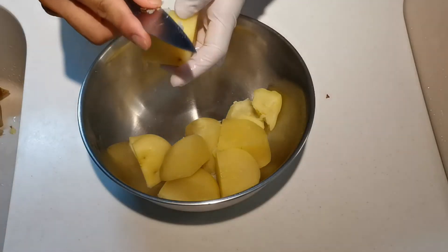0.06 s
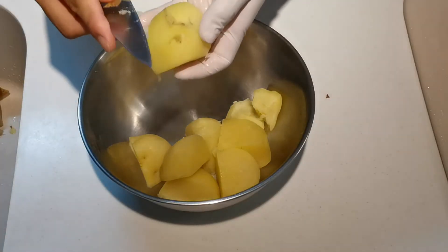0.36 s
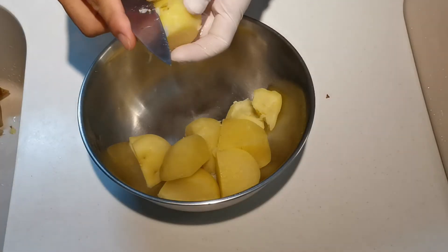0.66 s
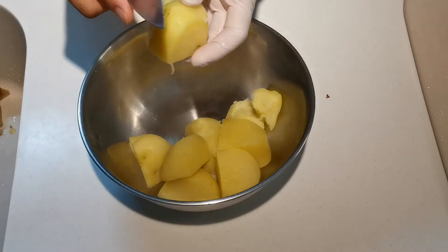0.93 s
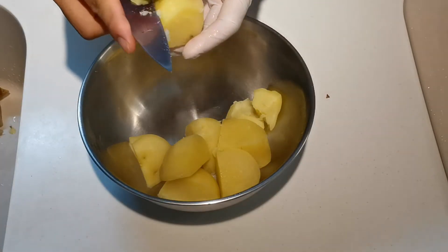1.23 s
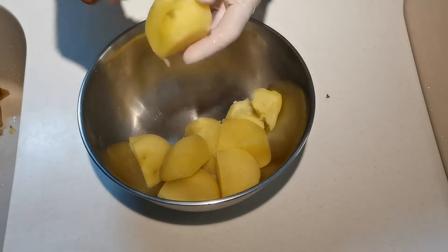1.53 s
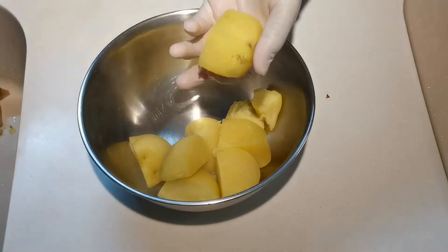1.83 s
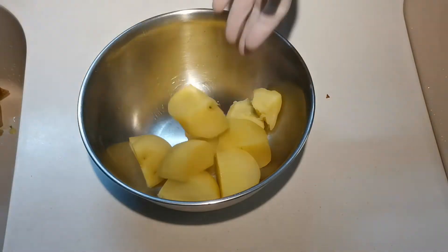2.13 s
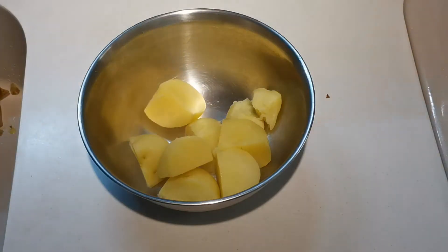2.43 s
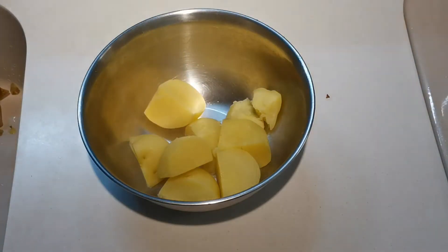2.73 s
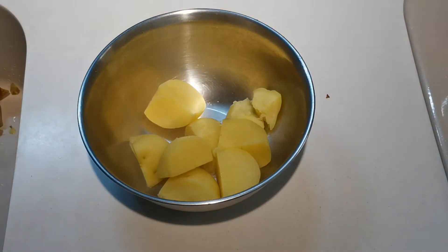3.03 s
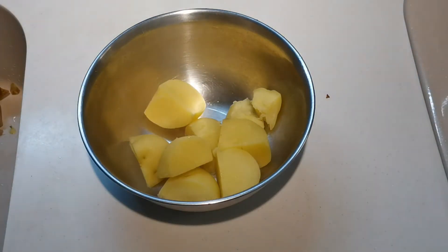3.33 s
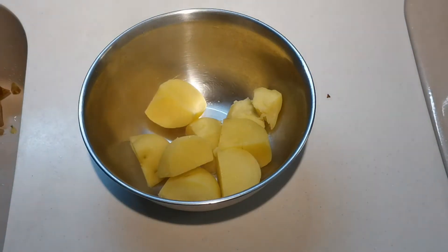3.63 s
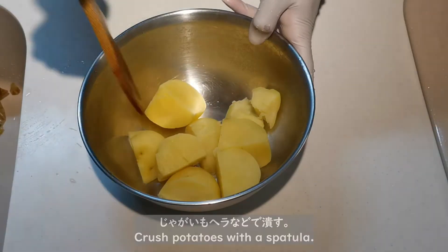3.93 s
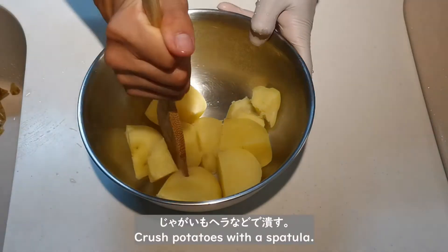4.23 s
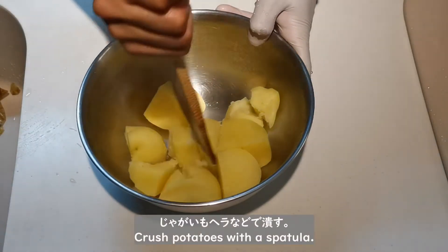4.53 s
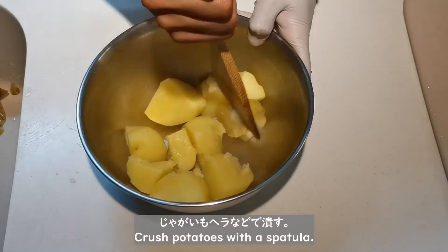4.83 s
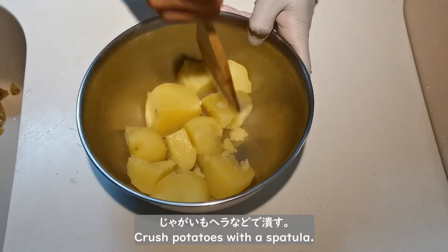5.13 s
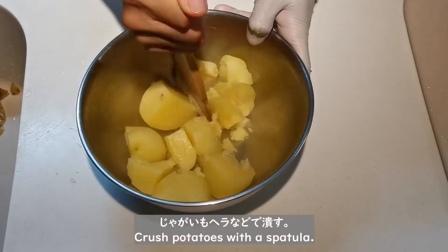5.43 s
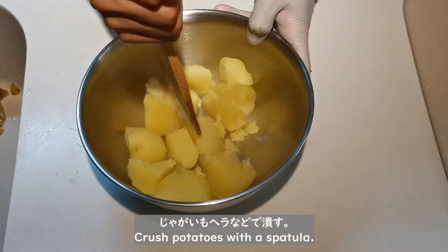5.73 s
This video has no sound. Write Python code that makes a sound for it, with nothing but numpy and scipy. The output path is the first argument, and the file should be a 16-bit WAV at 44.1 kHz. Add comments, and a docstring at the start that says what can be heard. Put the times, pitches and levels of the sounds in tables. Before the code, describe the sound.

In a small kitchen with a steady ventilation hiss, a knife cuts a boiled potato with faint wet slides and sticky ticks. A piece drops into a steel bowl with two soft, low thuds. After a pause and one dry tick, a wooden spatula chops down about six times, each stroke a moist squish and a short hollow knock on the steel. The sound is close, slightly to the right.

```python
"""A small kitchen, ringing briefly over a steady ventilation hiss. A boiled potato is cut over a steel
bowl and a piece drops in; then a wooden spatula chops down through the pieces.
The wet flesh squishes as tiny cells burst, and ticks as sticky surfaces part. Each stroke passes
through potato, then strikes the steel and excites its normal modes: a short hollow note, damped by
the food and a hand, with a boom from the worktop."""
import sys
import numpy as np
from scipy import signal
from scipy.fft import rfft, irfft
from scipy.io import wavfile
from scipy.ndimage import uniform_filter1d

SR = 44100
rng = np.random.default_rng(int(sys.argv[2]) if len(sys.argv) > 2 else 0)


def output_pcm(signal):
    """Save a mono or channel-first signal as 16-bit PCM at the path in sys.argv[1].

    Samples are clipped to [-1, 1] before scaling.
    """
    pcm = np.clip(np.atleast_2d(signal).T, -1, 1) * 32767
    wavfile.write(sys.argv[1], SR, np.round(pcm).astype(np.int16))


N = 263277
HZ = np.fft.rfftfreq(8192, 1 / SR) + 1  # frequency axis of pulse spectra


def amp(db):
    """Amplitude ratio of a level in decibels."""
    return 10 ** (np.asarray(db) / 20)

def unit_rms(x):
    """Normalisation to unit mean power."""
    return x / np.sqrt(np.mean(x ** 2) + 1e-20)

def curve(points, hz):
    """Interpolation on a log-frequency axis."""
    f, value = np.transpose(points)
    return np.interp(np.log(hz + 1), np.log(f + 1), value)

def bell(hz, centre_hz, octaves):
    """A Gaussian band on a log-frequency axis."""
    return np.exp(-.5 * (np.log2((hz + 1) / centre_hz) / octaves) ** 2)

def decay(t, t60):
    """Exponential damping: 60 dB in t60 seconds."""
    return np.exp(-np.log(1000) * t / t60)

def add(mix, s, sound):
    """Superposition of a sound starting at s seconds."""
    part = mix[..., max(round(s * SR), 0):][..., :sound.shape[-1]]
    part += sound[..., :part.shape[-1]]

def convolve(x, response):
    """Passage through a linear system, channel by channel."""
    return signal.fftconvolve(np.atleast_2d(x), np.atleast_2d(response), axes=1)[:, :N]

def pulse(gain):
    """Minimum phase: the shortest causal pulse with this spectrum."""
    log_gain = np.log(np.maximum(gain, 1e-5))
    mirrored = np.r_[log_gain, log_gain[-2:0:-1]]
    return np.fft.ifft(np.exp(np.conj(signal.hilbert(mirrored)))).real[:len(gain) // 2]

def panned(x, pan_db):
    """Localisation by level difference, left minus right."""
    return x * amp([[pan_db / 2], [-pan_db / 2]])

# spectrum of the air noise: (frequency [Hz], relative level [dB])
VENT_SPECTRUM = [(15, -30), (25, -5), (120, -4), (170, -10), (200, -2.5), (235, -5), (291, -9.5),
                 (572, -15), (637, -14), (691, -16), (3050, -22), (3880, -24), (4450, -24.5), (5820, -28.5),
                 (11000, -36.5), (15800, -31)]
# duct resonances, one dip and a faint whine: (frequency [Hz], width [Hz], gain [dB])
DUCT_PEAKS = [(195.6, 7.5, 11.5), (639, 17, 7), (2243, 10.4, 12.5), (2925, 380, 5), (4850, 740, 5),
              (5600, 660, -4.5), (15630, 110, 16)]
# likeness of left and right: (frequency [Hz], correlation [-1 to 1])
VENT_CORRELATION = [(60, 0.2), (180, 0.78), (550, 0.44), (1650, -0.06), (4970, 0.099), (15000, -0.12)]
def ventilation(level_db=-58):
    """Broadband air noise, coloured by duct resonance and partly correlated between the sides."""
    hz = np.fft.rfftfreq(N, 1 / SR)
    left, independent = rfft(rng.standard_normal((2, N)))
    alike = np.clip(curve(VENT_CORRELATION, hz), -1, 1)
    right = alike * left + np.sqrt(1 - alike ** 2) * independent
    peaks_db = sum(db / (1 + (2 * (hz - f) / width) ** 2) for f, width, db in DUCT_PEAKS)
    air = irfft(np.array([left, right]) * amp(curve(VENT_SPECTRUM, hz) + peaks_db), N)
    return amp(level_db) * unit_rms(air)

def rim_rub(force_db=-85, peak_s=0.036, swell_s=0.062):
    """Friction: a hand dragging on the rim exerts a low, rough force on the bowl."""
    t = np.arange(SR // 2) / SR
    band = bell(np.fft.rfftfreq(len(t), 1 / SR), centre_hz=247, octaves=0.45)
    drag = irfft(rfft(rng.standard_normal(len(t))) * band, len(t))
    return amp(force_db) * unit_rms(drag) * np.exp(-abs(t - peak_s) / swell_s)

# modes of the loaded bowl and the worktop: (frequency [Hz], relative level [dB], t60 [s])
BOWL_MODES = [(68.7, -53.5, 1.84), (128.2, -43.5, 0.41), (173.2, -40, 0.51), (205.44, -35.5, 0.48),
              (218.5, -40, 0.2), (254.5, -63, 0.23), (283, -49, 0.2), (352, -47, 0.11), (410, -37.5, 0.072),
              (460, -56, 0.047), (520, -50.5, 0.42), (538, -37.5, 0.073), (596, -41.5, 0.29),
              (611, -45, 0.42), (647, -47, 0.16), (724, -47, 0.4), (759, -50, 0.26), (801, -53.5, .28),
              (856, -44, 0.3), (935, -36.5, 0.15), (988.3, -41.5, 0.027), (1020, -44.5, 0.34),
              (1234, -37, 0.066), (1310, -43, 0.2), (1490, -31.5, 0.049), (1814, -55, 0.11),
              (1950, -58, 0.19), (2230, -42, 0.095), (2500, -57, 0.23), (2830, -48, 0.045),
              (3640, -65, 0.029), (4630, -63, .05), (7700, -59, .08)]
# the first push of air from the bowl: (frequency [Hz], relative level [dB])
AIR_PUSH = [(30, -6), (85, 1.5), (130, 15.5), (200, 13.5), (310, -3.5), (450, 8), (1000, -2), (2000, 1),
            (4000, -5), (8000, -7.5), (14000, -26.5)]
def bowl(force, gain_db=15.5, left_bass_db=-3.5, left_treble_db=-4.5, spot_spread_db=4.5, low_cut_hz=58):
    """Modal response: a force pushes the air once and rings each mode as far as the spot allows."""
    t = np.arange(SR) / SR
    push = pulse(amp(curve(AIR_PUSH, HZ)))
    response = np.zeros((2, SR))
    for k, (hz, db, t60) in enumerate(BOWL_MODES):
        treble = min((hz / 800) ** 2, 1)
        strength = amp(db + spot_spread_db * treble * rng.standard_normal())
        ring = strength * np.exp(2j * np.pi * hz * t) * decay(t, t60)
        skew = np.exp(.5j * (-1) ** k * treble)  # higher modes reach the two sides out of phase
        left = amp(left_bass_db + treble * (left_treble_db - left_bass_db))
        response += (np.array([[left / skew], [skew]]) * ring).real
    add(response, 0, amp([[left_bass_db], [0]]) * convolve(push, bending_waves()))
    response = reflections(response)
    add(response, 0, kitchen(push))
    radiation = signal.butter(2, low_cut_hz, "high", fs=SR, output="sos")  # too small for deep bass
    # the bottom is driven away from the listener, so the pressure drops first
    return -amp(gain_db) * convolve(force, signal.sosfilt(radiation, response))

def bending_waves(size=0.12, fade_s=0.0059, above_hz=650, scattered=0.45, left_db=-4):
    """Flexural waves circle the thin wall and smear the treble of a blow over milliseconds."""
    t = np.arange(2048) / SR
    waves = size * rng.standard_normal((3, len(t))) * np.exp(-t / fade_s)
    smear = (waves[2] + 1.8 * waves[:2]) * amp([[left_db], [0]]) - scattered * (t == 0)
    return (t == 0) + signal.sosfilt(signal.butter(2, above_hz, "high", fs=SR, output="sos"), smear)

# echoes off worktop and wall: (delay [s], left gain [ratio], right gain [ratio])
EARLY_ECHOES = [(.0021, -0.29, -0.11), (.0048, 0.17, 0.12), (.0075, 0.39, 0.088), (0.0142, 0.25, 0.22),
                (0.0253, -.12, -.16), (0.0286, 0.08, -0.18)]
def reflections(x):
    """Early reflection: near surfaces add delayed copies to the direct sound."""
    out = x.copy()
    for delay, left, right in EARLY_ECHOES:
        add(out, delay, np.array([[left], [right]]) * x)
    return out

# reverberation time: (frequency [Hz], t60 [s])
KITCHEN_T60 = [(100, 1.1), (400, 0.4), (1100, 0.42), (3000, 0.54), (8000, 0.41), (15000, 0.5)]
# colour of the reverberation: (frequency [Hz], relative level [dB])
KITCHEN_SPECTRUM = [(60, -34), (200, -1.5), (320, -3), (500, -1.5), (900, 6.5), (2000, -4), (5000, -1),
                    (10000, -4), (15000, -4)]
def kitchen(x, left_db=3.5, right_db=7.0, alike_below_hz=380):
    """Diffuse reverberation: dense echoes die band by band; long waves are alike on both sides."""
    shape = (2, 24000)
    taps = rng.choice([-1., 1.], shape) * (rng.random(shape) < .2)
    taps[:, :round(.004 * SR)] = 0
    hz, t, bands = signal.stft(unit_rms(taps), SR, nperseg=512)
    hz = hz[:, None]
    alike = 1 / (1 + (hz / alike_below_hz) ** 4)
    bands[1] = alike * bands[0] + np.sqrt(1 - alike ** 2) * bands[1]
    t60 = curve(KITCHEN_T60, hz)
    envelope = np.sqrt(2 * np.log(1000) / (t60 * SR)) * decay(t, t60)  # unit energy
    tail = signal.istft(bands * envelope * amp(curve(KITCHEN_SPECTRUM, hz)), SR, nperseg=512)[1]
    return convolve(x, tail * amp([[left_db], [right_db]]))

def long_waves(x, below_hz=400):
    """Coherence at long wavelengths: bass reaches both sides in phase."""
    spectrum = rfft(x)
    alike = 1 / (1 + (np.fft.rfftfreq(N, 1 / SR) / below_hz) ** 4)
    return irfft((1 - alike) * spectrum + alike * panned(spectrum.mean(0), pan_db=-2), N)

def squish(peak_s, db, rise_s, centre_hz, fall_s=0.018, octaves=1, cells=600, ring_cycles=1.24):
    """Bursting wet cells, each a damped oscillator, sum to a swell; gives start time and sound."""
    t = np.arange(-SR // 5, SR // 5) / SR
    age = np.arange(96)  # samples
    when, pitch, size, *phases = rng.random((cells, 5)).T[:, :, None]
    hz = 700 + pitch * (13800 - 700)
    cycles = hz * age / SR
    pop_db = 4.5 * np.minimum(-np.log(size), 3)
    envelopes = amp(pop_db) * np.sqrt(hz) * np.exp(-cycles / ring_cycles)
    pops = [envelopes * np.sin(2 * np.pi * (cycles + phase)) for phase in phases]
    at = (when * (len(t) - len(age))).astype(int) + age
    grains = [np.bincount(at.ravel(), side.ravel(), len(t)) for side in pops]
    band = bell(np.fft.rfftfreq(len(t), 1 / SR), centre_hz, octaves)
    fizz = unit_rms(irfft(rfft(grains) * band, len(t)))
    swell = np.exp(-np.where(t < 0, (t / rise_s) ** 2, t / fall_s))
    return peak_s + t[0], (amp(db) * swell * fizz)[:, t > -peak_s]

# wet slides: (peak time [s], level [dB], rise [s], centre [Hz])
WET_SLIDES = [(.10, -62.5, .031, 4660), (.81, -73, .034, 6960), (.92, -76, .02, 7000),
              (1.39, -70, .019, 7050), (1.739, -70, .012, 8000), (1.865, -65, .053, 2850),
              (1.973, -62, .024, 2860), (1.985, -71, .037, 8000), (2.094, -58.5, .015, 6200),
              (2.149, -58, .037, 7700), (2.346, -59.5, .014, 6760), (2.496, -68, .02, 5600),
              (4.992, -57, .008, 3200), (5.258, -52, .015, 3800), (5.701, -53, .036, 7040),
              (5.735, -58, .023, 6000), (5.767, -52.5, .025, 5630), (5.897, -59, .018, 9000)]
def slides():
    """Sliding friction: potato on knife, glove or other pieces gives a broad fizz."""
    wet = np.zeros((2, N))
    for slide in WET_SLIDES:
        add(wet, *squish(*slide))
    return wet

def snap(db, centre_hz, octaves=0.47, crumble_s=0.0032, crumble=0.11):
    """Adhesion fails: a sticky surface lets go with a sharp click and a short crumbling tail."""
    t = np.arange(512) / SR
    burst = (t == 0) + crumble * rng.standard_normal((2, len(t))) * np.exp(-t / crumble_s)
    return amp(db) * convolve(burst, pulse(bell(HZ, centre_hz, octaves) + 0.076))

# spells of cutting and of mashing: (start [s], end [s], tick rate [1/s], level [dB])
STICKY_SPELLS = [(0.199, 2, 7.1, -63), (4.95, 6.7, 8, -60)]
def sticky_ticks(spread_db=2):
    """Weak adhesion: worked potato comes unstuck in faint ticks at loosely spaced random times."""
    wet = np.zeros((2, N))
    for start, end, per_s, db in STICKY_SPELLS:
        for slot in np.arange(start, end, 1 / per_s):
            s = slot + rng.random() / per_s
            add(wet, s, snap(db - spread_db * rng.standard_normal(), centre_hz=9000))
    return wet

# the loudest releases: (time [s], level [dB], centre [Hz], width [octaves])
LOUD_SNAPS = [(.27, -43, 11200, .47), (.502, -40.5, 7200, 0.99), (0.527, -30.5, 4100, 0.33),
              (2.1394, -22, 11800, 0.1), (2.141, -33, 5530, 1), (2.192, -34, 10800, .47),
              (4.264, -20, 11730, 0.71), (4.711, -12, 6850, 0.18), (4.779, -24, 10800, .1),
              (4.992, -43, 7400, .47), (5.080, -32.5, 7940, 0.39), (5.252, -22.5, 9000, 1),
              (5.5046, -19.5, 8050, 0.64), (5.547, -29, 9000, .5), (5.681, -15, 10400, 0.14),
              (5.681, -10.5, 6850, 0.09), (5.708, -36, 11000, 0.26), (5.756, -13, 4130, 0.29),
              (5.784, -30, 11800, .15), (5.913, -30, 8000, 0.98), (5.951, -23, 7000, 0.38)]
def sticky_snaps():
    """Strong adhesion: pieces pull free in single sharp snaps."""
    wet = np.zeros((2, N))
    for s, *release in LOUD_SNAPS:
        add(wet, s, snap(*release))
    return wet

def contact(corner_hz, fall_db_per_octave):
    """Impact spectrum: flat up to a corner set by the duration of contact."""
    return (1 + (HZ / corner_hz) ** 4) ** (-fall_db_per_octave / 24)

def thud(db, corner_hz=118, bulge_db=5.5):
    """Compliant impact: a long, soft contact gives a force with little treble."""
    bulge = amp(bulge_db * bell(HZ, corner_hz, octaves=0.42))
    return amp(db) * pulse(contact(corner_hz, fall_db_per_octave=22.5) * bulge)

# soft blows on the bowl: (time [s], force level [dB], contact corner [Hz])
SOFT_BLOWS = [(2.143, -20, 118), (2.168, -12.5, 113), (2.186, -17.5, 118), (2.335, -8.5, 143),
              (2.338, -35, 940), (2.349, -24, 810), (4.758, -11.5, 148), (4.7615, -17, 760),
              (4.782, -16.5, 820), (4.955, -8.5, 118), (5.224, -13, 148), (5.226, -31.5, 593),
              (5.674, -7, 109), (5.689, -28, 118), (5.829, -19.5, 118.6), (5.878, -31.5, 780),
              (5.943, -5.5, 148)]
def bumps():
    """Momentum transfer: the force on the bowl as pieces drop or tumble, or blade or hand bumps it."""
    force = np.zeros(N)
    for s, db, corner_hz in SOFT_BLOWS:
        add(force, s, thud(db, corner_hz))
    return force

# squeaks and scrapes: (peak time [s], level [dB], rise and fall [s], centre [Hz], width [octaves])
RUBBING_SQUEAKS = [(2.154, -51.5, .0035, 1250, .081), (2.49, -76, .02, 4800, .05),
                   (2.496, -76, .025, 5820, .04), (2.563, -69.5, .02, 5780, .028),
                   (2.565, -78, .028, 6850, .05), (2.566, -83, .028, 11870, .02),
                   (4.581, -66.5, .12, 4560, .1), (4.649, -61, .06, 1150, .072)]
def squeaks():
    """Rubbing friction: a fizz confined to a narrow band is heard as a pitch."""
    wet = np.zeros((2, N))
    for s, db, swell_s, hz, octaves in RUBBING_SQUEAKS:
        add(wet, *squish(s, db, swell_s, hz, fall_s=swell_s, octaves=octaves))
    return wet

def dry_tick(s=3.6812, db=-12.5):
    """A short dry click between drop and mashing, with no ring."""
    out = np.zeros(N)
    add(out, s, amp(db) * pulse(bell(HZ, centre_hz=885, octaves=0.41) + 0.057))
    return out

def knock(db, corner_hz, fall_db_per_octave, click_db, boom_db, low_hz, low_db, high_hz, high_db):
    """Impact of wood on steel: a film of potato cushions it, and each spot favours other modes."""
    blow = np.hypot(contact(corner_hz, fall_db_per_octave), amp(click_db))
    spot_db = (boom_db * bell(HZ, centre_hz=70, octaves=0.47)
               + low_db * bell(HZ, low_hz, octaves=0.33)
               + high_db * bell(HZ, high_hz, octaves=0.12))
    return bowl(pulse(blow * amp(db + spot_db)))

def wall_note(hz, db, t60, delay_s=0.002903, rise_s=0.0034, room_db=-20.5):
    """Resonance builds as waves circle the bowl: the bare wall by the blade sings one short note."""
    t = np.maximum(np.arange(SR // 2) / SR - delay_s, 0)
    main = amp(db) * decay(t, t60) * np.sin(2 * np.pi * hz * t)
    woody_partner = amp(db - 9.5) * decay(t, t60=0.032) * np.sin(2 * np.pi * 1.18 * hz * t)
    note = (1 - np.exp(-t / rise_s)) * (main + woody_partner)
    out = amp(room_db) * kitchen(note)
    add(out, 0, panned(note, pan_db=-6))
    return out

# modes of the wooden blade: (frequency [Hz], relative level [dB], t60 [s])
BLADE_MODES = [(2700, -4, 0.02), (3186, -5, 0.027), (3695, -7.5, 0.047), (3900, -8.5, 0.012),
               (4340, -1, 0.015), (6500, -15, 0.017)]
def blade_crack(db, room_db=-17):
    """Heavily damped vibration: on meeting bare steel, the wood rings for an instant."""
    t = np.arange(SR // 10) / SR
    wood = sum(amp(db + mode_db) * decay(t, t60) * np.sin(2 * np.pi * (hz * t + rng.random((2, 1))))
               for hz, mode_db, t60 in BLADE_MODES)
    out = amp(room_db) * kitchen(wood)
    add(out, 0, reflections(panned(wood, pan_db=-6)))
    return out

# chops: (knock time [s], force level [dB], contact corner [Hz], fall [dB/octave], hard click [dB],
#   boom [dB], low band [Hz], its gain [dB], high band [Hz], its gain [dB],
#   wall note [Hz], its level [dB], its t60 [s], blade crack [dB], left minus right [dB],
#   travel through potato [s], shove [dB], squish [dB], squish centre [Hz])
SPATULA_STROKES = [(4.3004, -4, 1340, 17.3, -11, -2.5, 870, 1, 2130, 3, 626, -26, 0.051, -53, 1.5, 0.03, -9.5, -39.5, 2960),
                   (4.736, 3, 760, 15, -29.5, -1, 795, 3, 1950, 2.6, 771, -9, 0.11, -35, -1.9, 0.031, -4, -45, 6500),
                   (5.0226, -4, 1004, 33.3, -43, 6.5, 436, -4.5, 820, 4.6, 780, -19.5, 0.11, -68, -2.2, .045, -40, -50, 6500),
                   (5.2689, -2.5, 1390, 20, -67, 6.5, 925, 2, 2640, 6.5, 1006, -3, 0.035, -36, 0.32, 0.04, -14, -53.5, 5400),
                   (5.506, -3.5, 660, 7, -40, 7.5, 373, 6.5, 2540, 5.8, 430, 0.5, 0.029, -23, 1.4, 0.0276, -10, -54, 8000),
                   (5.9175, -3.5, 1370, 15, -35, 5, 920, -4, 1400, 1.6, 1315, -19, 0.034, -27.5, 0.15, 0.023, -14, -47, 6900)]
def spatula():
    """Yield, then impact: potato gives way and the blade hits steel; gives knocks, force, wet sound."""
    knocks, force, wet = np.zeros((2, N)), np.zeros(N), np.zeros((2, N))
    for stroke in SPATULA_STROKES:
        s, *blow, note_hz, note_db, note_t60, crack_db, pan_db = stroke[:-4]
        travel_s, shove_db, squish_db, squish_hz = stroke[-4:]
        touch_s = s - travel_s
        yield_s = touch_s + 0.48 * travel_s
        add(force, touch_s, thud(shove_db))
        add(force, yield_s, thud(shove_db - 3.5))
        add(wet, *squish(yield_s, squish_db, rise_s=0.45 * travel_s, centre_hz=squish_hz))
        for sound in knock(*blow), wall_note(note_hz, note_db, note_t60), blade_crack(crack_db):
            add(knocks, s, panned(sound, pan_db))
        # mash oozes out from under the blade
        add(wet, *squish(s + 0.05, db=-61.5, rise_s=0.021, centre_hz=7500))
    return knocks, force, wet

def scene():
    """Superposition of bowl and wet potato, a little to the right, with the room and its air noise."""
    air = ventilation()
    knocks, force, crushed = spatula()
    add(force, 0, rim_rub())
    handled = slides() + squeaks() + sticky_snaps()
    steel = long_waves(knocks + bowl(force + bumps()))
    potato = (crushed + handled + sticky_ticks()) * amp([[-2.5], [1]])
    return steel + reflections(potato) + amp(-10) * kitchen(potato) + dry_tick() + air

# soft top end: (frequency [Hz], gain [dB])
TREBLE_ROLLOFF = [(9000, 1), (12000, 0.5), (13500, -5), (15000, -14), (16000, -15)]
def record(dry, threshold_db=-21, ratio=1.42, recovery_db_per_s=7, edge_hz=15850):
    """Compression ducks the room after loud knocks; low-pass filtering softens and limits the treble."""
    power = uniform_filter1d((dry ** 2).mean(0), size=400)
    power_db = 10 * np.log10(abs(power) + 1e-12)
    recovery_db = np.arange(N) * recovery_db_per_s / SR
    held_db = np.maximum.accumulate(power_db + recovery_db) - recovery_db
    over_db = np.maximum(held_db - threshold_db, 0)
    ducked = dry / amp((1 - 1 / ratio) * uniform_filter1d(over_db, size=200))
    softened = convolve(ducked, pulse(amp(curve(TREBLE_ROLLOFF, HZ))))
    band_limit = signal.firwin(511, edge_hz, window=("kaiser", 9), fs=SR)
    return signal.oaconvolve(softened, band_limit[None], "same")


dry = scene()
out = record(dry)
output_pcm(out)
```